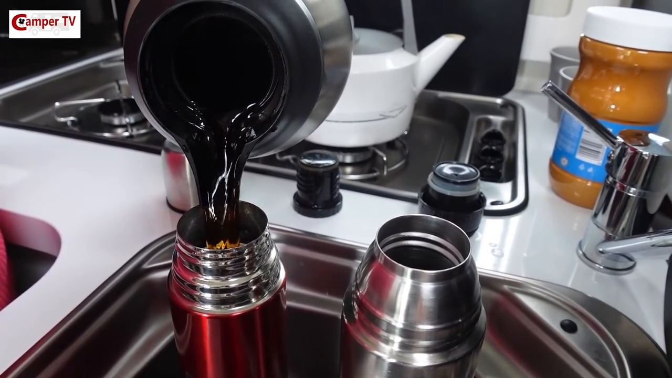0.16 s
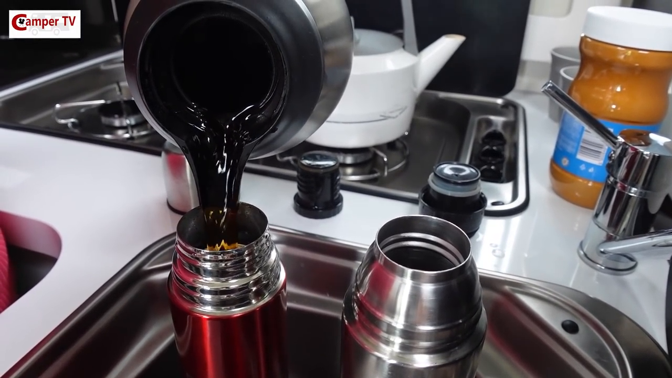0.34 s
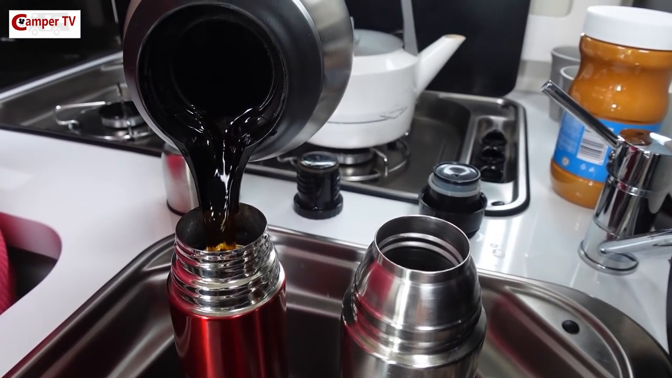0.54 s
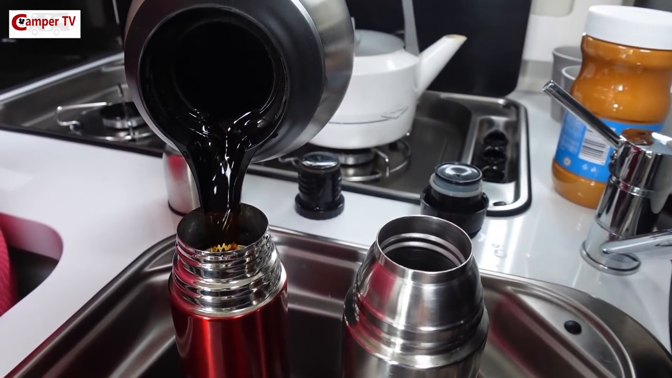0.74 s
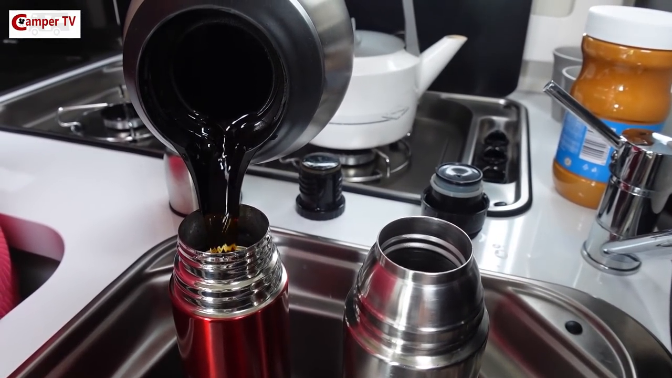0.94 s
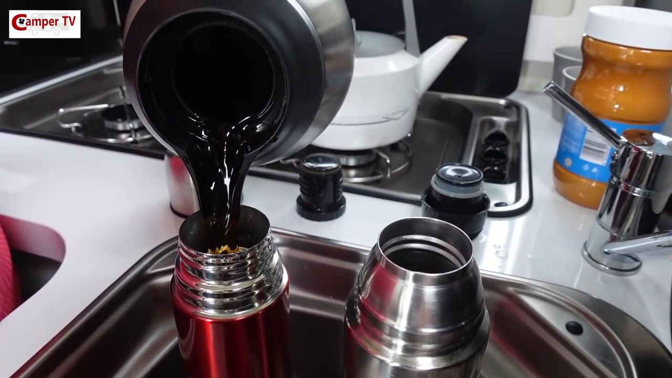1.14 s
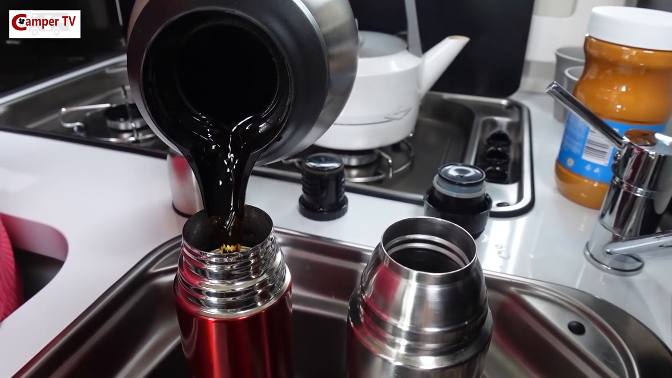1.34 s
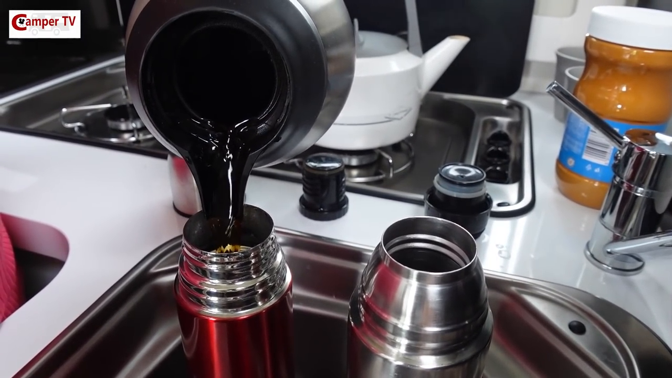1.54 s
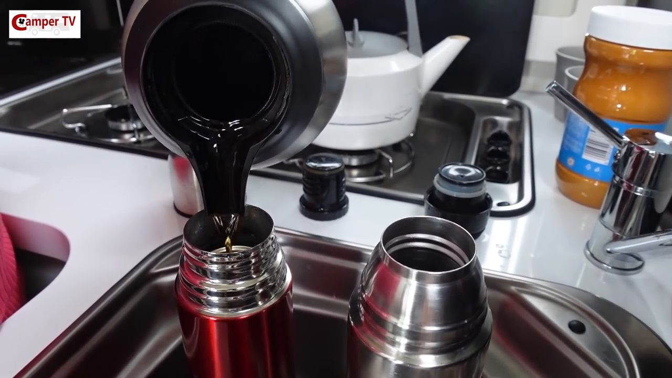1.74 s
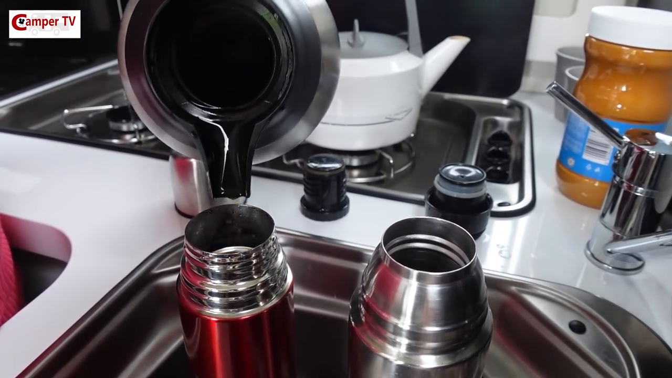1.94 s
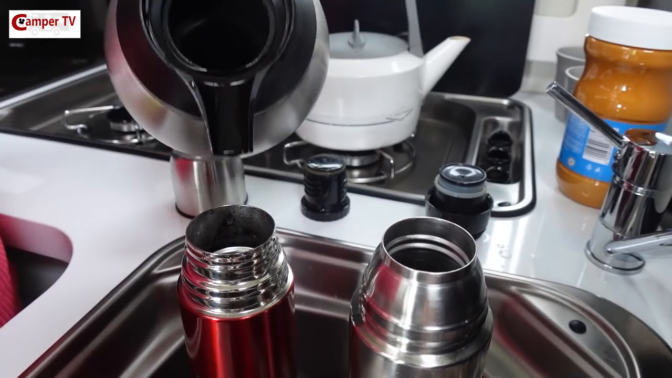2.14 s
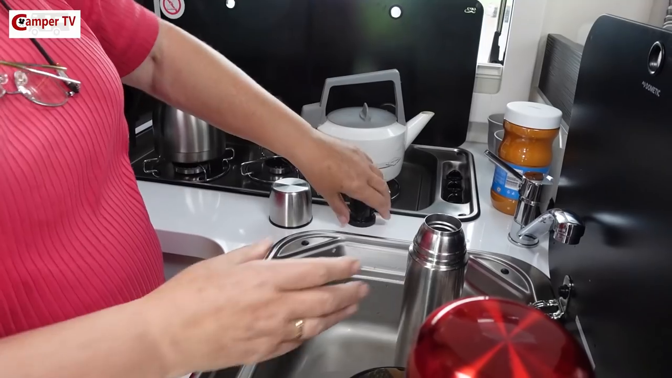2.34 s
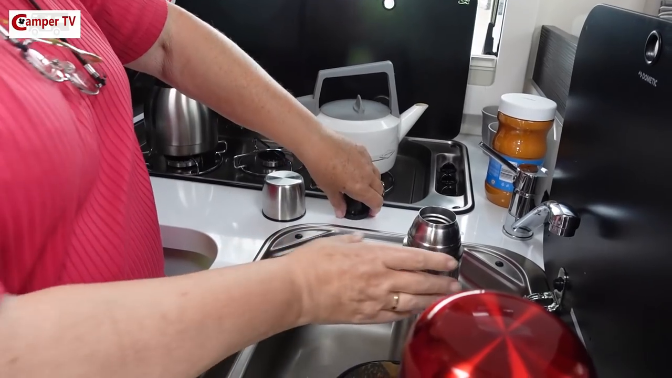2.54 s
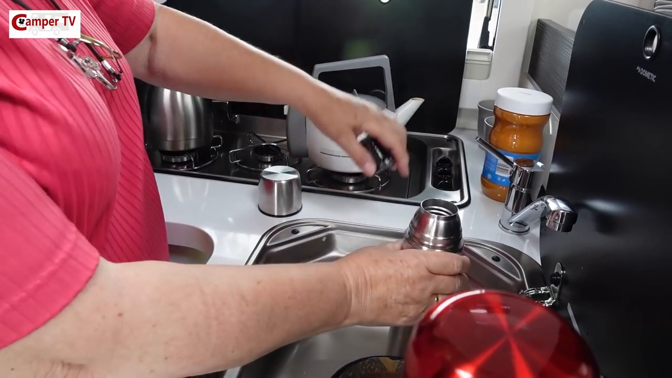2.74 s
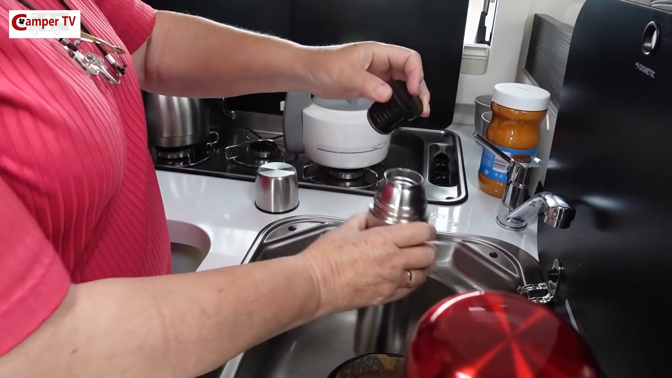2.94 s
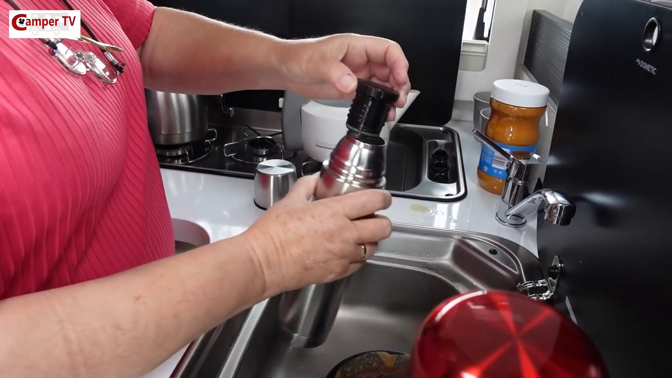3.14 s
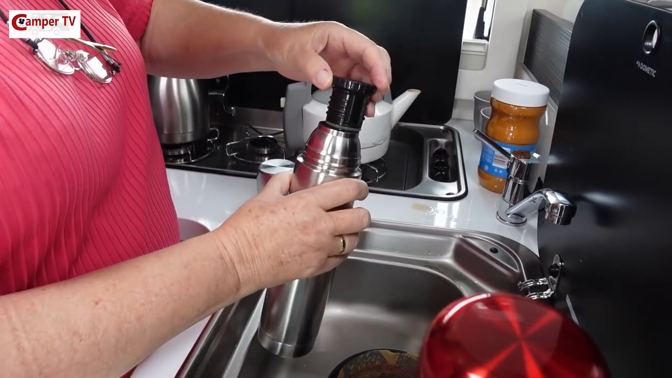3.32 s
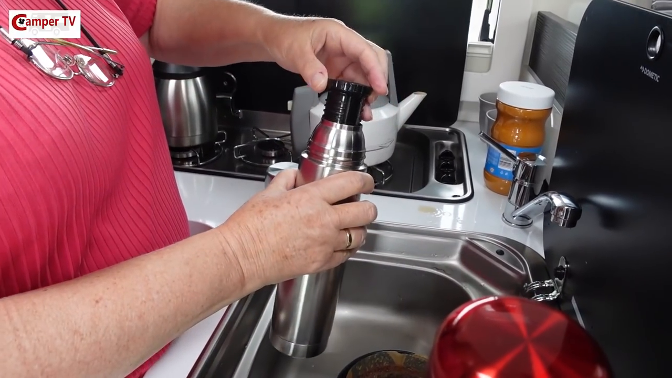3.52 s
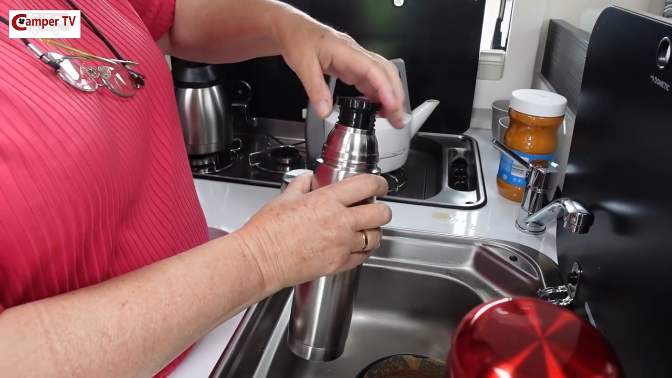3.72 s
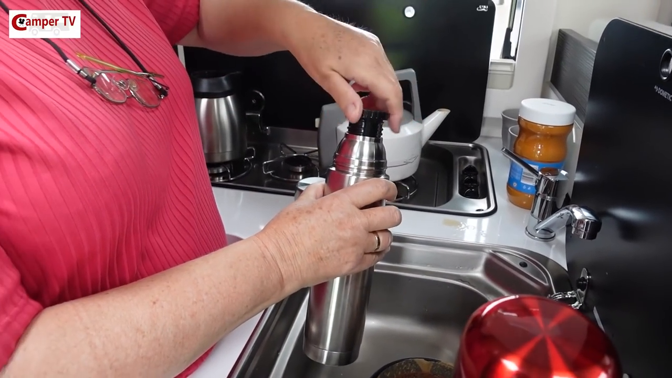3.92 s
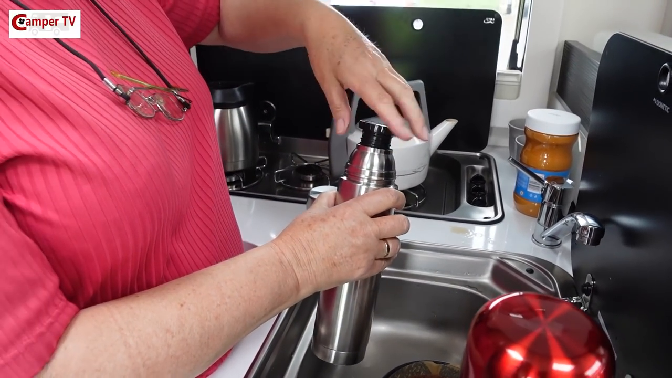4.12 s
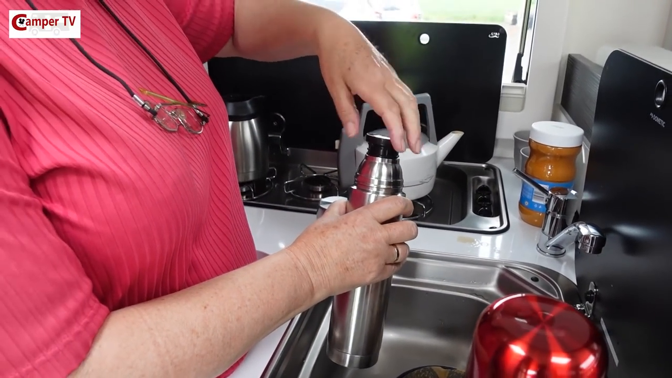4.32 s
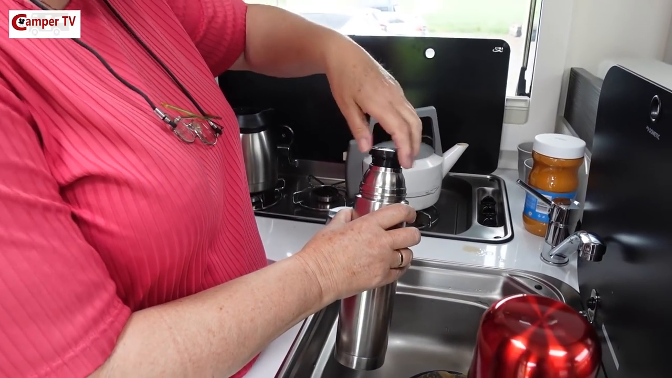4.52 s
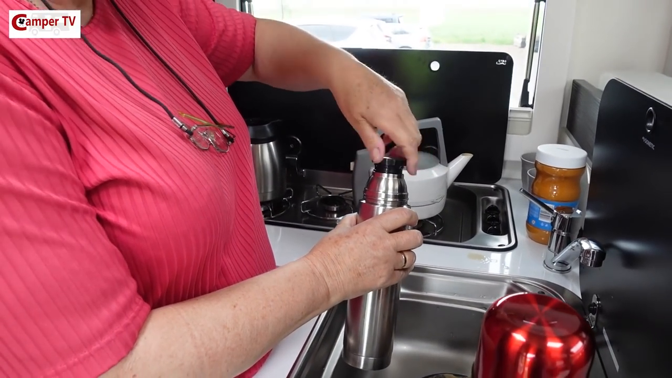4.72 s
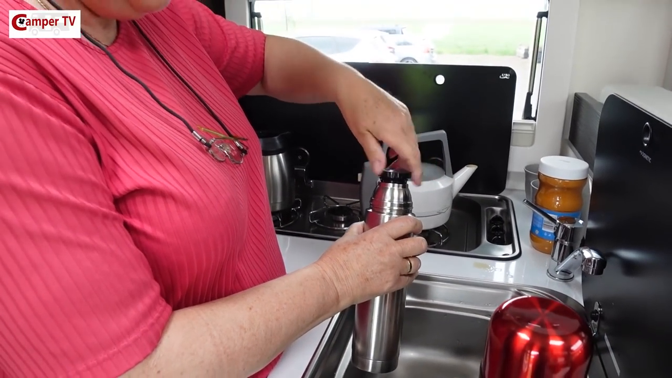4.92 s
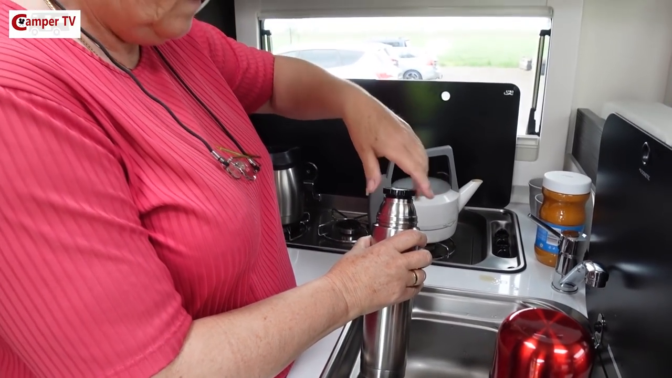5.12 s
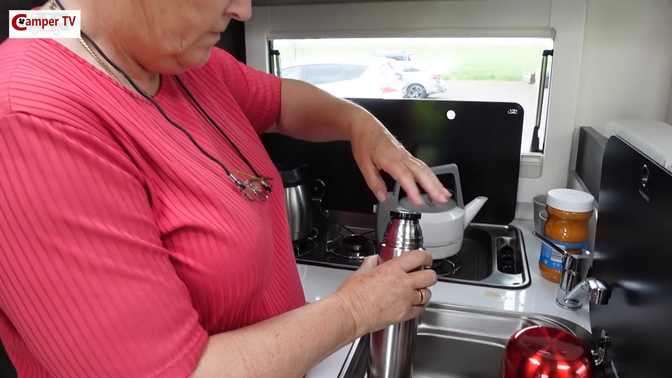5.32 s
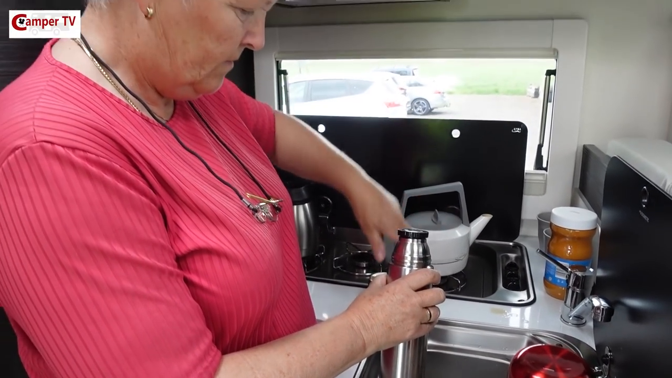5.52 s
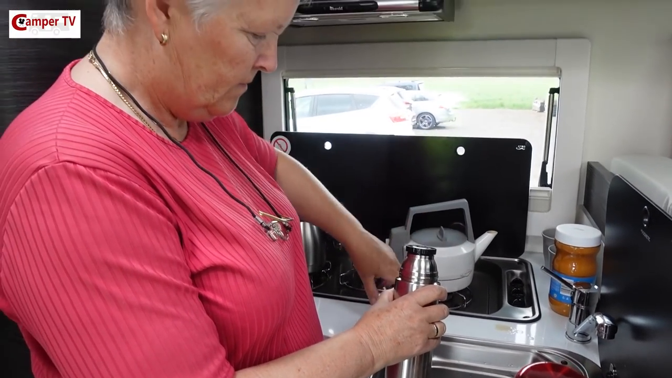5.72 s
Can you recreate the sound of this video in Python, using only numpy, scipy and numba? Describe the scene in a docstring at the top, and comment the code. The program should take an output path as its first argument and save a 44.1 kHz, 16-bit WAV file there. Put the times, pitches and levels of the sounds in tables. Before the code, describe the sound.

Close microphone, dry small room, same sound in both channels. First a lively bubbling stream ringing in a narrow metal neck, with fine splashes; it dwindles to a stop. Next a flask thumps and drags softly, a stopper clicks on steel and falls in with a clatter, then several gritty turns clack and rasp over low, hollow trapped air, ending in quiet room tone.

```python
"""A small, quiet kitchen, heard close up: coffee is poured into a steel vacuum flask standing in the sink.
Bubbles and spatter are noise clicks and short gliding tones that ring the air above the coffee.
The flask is picked up with a bump; a plastic stopper taps its rim, drops into the neck and is screwed down.
Knocks and rasping turns shake stopper, steel and trapped air, which hums lower once the neck is closed."""
import sys
import numpy as np
from scipy import signal
from scipy.fft import rfft, irfft
from scipy.io import wavfile
from scipy.ndimage import uniform_filter1d
from numba import njit

SR = 44100
rng = np.random.default_rng(int(sys.argv[2]) if len(sys.argv) > 2 else 0)


def transcribe(signal):
    """Save signal, clipped to [-1, 1], as a 16-bit WAV file at the path in sys.argv[1]."""
    frames = np.atleast_2d(signal).T
    limited = np.clip(frames, -1, 1)
    pcm = np.round(limited * 32767).astype(np.int16)
    wavfile.write(sys.argv[1], SR, pcm)


N = 254016  # length of the scene in samples
TIME = np.arange(N) / SR  # clock of the whole scene, s
AGE = TIME[:SR // 2]  # clock of one short sound, s

# strength of the stream: [t/s, bubbling level/dB]
STREAM = [(0.0, -24.5), (0.9, -22.5), (1.28, -22.5), (1.34, -29.5), (1.41, -27), (1.45, -21.5),
          (1.8, -24.5), (1.85, -29), (2.03, -28.5), (2.12, -50.5)]
# head of foam, which builds, then collapses as the stream thins: [t/s, foam 0-1]
FOAM_HEAD = [(0.1, 0), (0.55, 0.22), (1.2, 1), (1.8, 0.73), (2.03, 0.22)]
# fixed resonances of neck and basin: [f/Hz, width/Hz, level/dB, change at full foam/dB]
NECK_MODES = [(662, 40, -4, 5), (877, 60, -5, 5), (1150, 22, -4, -1), (2640, 150, -1.5, -5),
              (3620, 110, 0, -3), (4940, 300, -10, -2)]
# big bubbles bursting: [t/s, level/dB]
BIG_BUBBLES = [(0.125, -5.5), (0.151, -11.5), (0.404, -9.5), (0.521, -16.5), (0.585, -6.5), (0.674, -5.5),
               (0.72, -5), (0.809, -6), (0.921, -3.5), (1.169, -7.5), (1.517, -12), (1.747, -4),
               (2.015, -17)]
# drops slapping the wall: [t/s, level/dB]
SLAPS = [(0.1516, -14.5), (0.52, -11), (0.64, -11), (0.69, -7), (0.9998, -8.5), (1.1124, -11),
         (1.156, -7.5), (1.171, -9), (1.2078, -13.5), (1.597, -11), (1.8696, -16.5), (1.892, -11),
         (1.958, -15), (2.075, -25)]
# tone colour of the spatter: [f/Hz, level/dB]
SPATTER_COLOUR = [(2000, -4.5), (3600, -5.5), (4400, -13), (4950, -1), (7200, -6.5), (8770, -2),
                  (11000, -9), (16000, -28)]
# tone colour of the bubbles: [f/Hz, level/dB]
FROTH_COLOUR = [(100, 4), (500, -13), (750, -1.5), (1300, 3.5), (2050, -3.5), (3000, 1), (6000, -10.5),
                (12000, -41)]
# dull bumps on sink and worktop: [t/s, level/dB, f/Hz]
THUDS = [(2.337, -32, 300), (2.472, -12, 339), (2.516, -21.5, 462), (2.540, -26, 436), (2.795, -27, 245),
         (3.278, -30.5, 488), (4, -28.5, 220), (5.582, -25, 149)]
# tone colour of a bump: [f/Hz, level/dB]
THUD_COLOUR = [(70, -0.5), (200, 0.5), (650, -1.5), (1000, -9.5), (2500, -24.5), (6000, -22), (10000, -31),
               (16000, -76)]
# light sliding touches: [start t/s, length/s, level/dB]
SLIDING_TOUCHES = [(2.747, 0.15, -39.5), (3.4, 0.42, -44.5), (5.664, 0.15, -39)]
# tone colour of a sliding touch: [f/Hz, level/dB]
SLIDING_COLOUR = [(120, 15.5), (220, 4), (1600, -3), (3800, -7), (6000, -6.5), (12000, -18)]
# stopper against the neck: [t/s, level/dB, pop of the air relative to it/dB]
STOPPER_KNOCKS = [(3.163, -11.5, -13.5), (3.327, -4, -20.5), (3.426, -22, -24), (3.606, 0.5, -6),
                  (3.689, -2, -10), (3.718, 0, -9), (3.734, 2, -8), (4.079, -16, -19), (4.131, -21, -9),
                  (4.18, -36, 16), (4.33, -6.5, -10), (4.547, -0.5, -22), (4.572, 4, -9),
                  (4.616, -3.5, -10), (4.784, 2.5, -26), (4.803, -2.5, -2.5), (5.004, -9, -17),
                  (5.016, -1, -17.5), (5.084, -3.5, -20), (5.229, 2.5, -13.5), (5.243, 1.5, -50),
                  (5.268, 3.5, -22), (5.316, -1.5, -29)]
# ringing modes of the steel: [f/Hz, level struck on the rim/dB, level through the thread/dB,
# time to fade by 60 dB with the neck open/s]
STEEL_MODES = [(964.3, 5.5, 1.5, 0.2), (2040, -16, -6, 0.089), (2153, 3, 6, 0.11), (2690, -24, -17, 0.8),
               (2880, -16, -32, 0.23), (3287, -14, 0, 0.29), (3690, -5, -3, 0.22), (3727, 0, 4.5, 0.15),
               (5640, -16, 5, 0.11), (5950, 8, 6.5, 0.036), (6090, -4, -5.5, 0.23), (6330, -6, -2, 0.11),
               (9870, -28, 1.5, 0.036)]
# average tone colour of the plastic stopper in the neck: [f/Hz, level/dB]
STOPPER_COLOUR = [(110, -51), (230, -1), (350, -1), (720, 6), (1250, 0), (2150, 0.5), (2550, -9.5),
                  (3900, -3.5), (4900, -11), (6000, -9), (10800, -15), (12500, -35)]
# twists of the hand, a bite of the thread and then a free spin:
# [start t/s, length/s, bite level/dB, spin level/dB]
HAND_TWISTS = [(4.039, 0.17, -32.5, -30), (4.319, .18, -22, -22), (4.551, 0.14, -48, -20.5),
               (4.775, 0.2, -19, -22.5), (5.005, 0.19, -24, -18.5), (5.229, .21, -22, -16.5)]
# tone colour of the quiet room: [f/Hz, level/dB]
ROOM_COLOUR = [(15, -77), (25, -1.5), (117, -8), (170, -15), (439, -14), (714, -18.5), (1020, -23),
               (16000, -30.5)]

# flask dragging in the sink, stopper scraping round the rim: (start s, length s, level dB)
# and what each makes resonate: (Hz, width Hz, dB)
DRAG, DRAG_RING = (2.49, 0.23, -37), [(490, 430, 0)]
RIM_SCRAPE, RIM_RING = (3.42, 0.26, -40), [(3550, 320, -1.5), (4070, 240, -1), (5500, 2200, -10)]
# parts of a twist: (start share, length share, air dB, brightness dB per octave)
BITE, SPIN = (0, 0.4047, -12, 1), (0.3, 0.7, -0.92, 0.68)

# air in the open and in the plugged neck
OPEN_HZ, CLOSED_HZ = 389, 220.2
OPEN_T60_S, CLOSED_T60_S = 0.44, 0.095
# first air resonance: foam lowers and widens it
FOAM_DROP_HZ, CLEAR_WIDTH_HZ, FOAMY_WIDTH_HZ = 52, 11, 210
# it lifts while the thinning stream frees the mouth
THINS_S, STOPS_S, LIFT_HZ = 1.896, 2.04, 57
# second air resonance: climbs as the flask fills
SECOND_HZ, CLIMB_HZ_PER_S, FULL_HZ = 1490, 145, 1724
# layers relative to the bubbling, and what full foam adds to each
GURGLE_DB, GURGLE_FOAM_DB, GURGLE_BUILD_S = 7, -6.5, 0.097
SPATTER_DB, SPATTER_FOAM_DB = -6, 1
CHURN_HZ, CHURN_DB = 203, -13.5  # dull churning of the coffee below the air resonance
BASIN_HZ, BASIN_DB = 93, -12.5  # low drumming of the sink under the flask
HOLLOW_HZ = 499  # gap above the first air resonance
# the stream goes quieter just before a big bubble closes
LULL_S, LULL_DB = 0.02, -1
# spray comes in short spits over an even wash
SPITS_PER_S, SPIT_SPREAD_DB, SPIT_T60_S, WASH_DB, MIST_DB = 85, 3, 0.06, -10, -2
# the glug of foam round a big bubble
GLUG_LEAD_S, GLUG_S, GLUG_WIDTH_HZ, GLUG_DB = 0.012, 0.054, 200, -18
# the stopper slips into the neck and closes it
DROP_S, DROP_EASE_S = 3.59, 0.0348
# ring of the steel under a knock; fingers taking hold for a twist mute it for a moment
RING_DB, GRIP_DB, GRIP_S = -20, -11, 0.035
PRESS_DB_PER_DB = -0.05  # harder blows press the stopper on and ring relatively less
CONTACT_SCATTER_DB = 2.2  # how much the stopper's colour varies between contacts
# the thread catches unevenly: length and typical depth of a catch, range of the contact resonance
CATCH_S, CATCH_DB, CONTACT_HZ = 0.006, 2.4, (1200, 4800)
# the seal meets the neck and stifles the air
SEAL_FROM_S, SEAL_TIGHT_S, SEAL_DB = 5.1, 5.25, -10
# a low rumble while the stopper is tightened and let go
RUMBLE_FROM_S, RUMBLE_TO_S, RUMBLE_HZ, RUMBLE_DB = 4.6, 5.85, 71.4, -40
RELEASE_S, RELEASE_DB = 5.41, -32  # the hand lets go
# room tone, and the recorder's hiss and upper limit
ROOM_DB, HISS_DB, TOP_HZ = -44.5, -63, 16100
# gain control: loud passages pull the gain down, and it creeps back
AGC_THRESHOLD_DB, AGC_SLOPE, AGC_ATTACK_S, AGC_RELEASE_S = -22.5, 0.22, 0.0057, 0.4


def amp(db):
    """Turn decibels into a gain."""
    return 10 ** (np.asarray(db) / 20)


def unit(x):
    """Scale to an rms (average strength) of 1."""
    return x / np.sqrt(np.mean(x ** 2) + 1e-18)


def crest(x):
    """Scale to a peak of 1."""
    return x / np.abs(x).max()


def even(x, size=3000):
    """Hold the running rms near 1 and keep the fine grain."""
    power = uniform_filter1d(x ** 2, size)
    return x / np.sqrt(np.abs(power) + 1e-6 * np.mean(x ** 2))


def curves(table):
    """Join the columns of a table by straight lines in time."""
    s, *columns = np.transpose(table)
    return [np.interp(TIME, s, c) for c in columns]


def add(out, s, x):
    """Mix x into out from time s."""
    i = max(int(s * SR), 0)
    out[i:i + len(x)] += x[:max(len(out) - i, 0)]


def noise():
    """White noise as long as one short sound."""
    return rng.standard_normal(len(AGE))


def fade(t60):
    """Exponential decay that falls by 60 dB in t60 seconds."""
    return np.exp(-np.log(1000) * AGE / t60)


def ring(hz, t60, rise=0.0021):
    """One damped resonance; its pitch may glide."""
    phase = 2 * np.pi * np.cumsum(hz * np.ones(len(AGE))) / SR
    return np.sin(phase) * fade(t60) * (1 - np.exp(-AGE / rise))


def colour(x, points, tilt_db=0, size=2048):
    """Filter with the given (Hz, dB) shape, tilted by dB per octave, without sounding ahead of x."""
    hz, db = np.transpose(points)
    octave = np.log2(np.maximum(np.fft.rfftfreq(size, 1 / SR), 10))
    shape_db = np.interp(octave, np.log2(hz), db) + tilt_db * (octave - np.log2(2000))
    # folding the cepstrum gives the minimum-phase filter
    cepstrum = irfft(np.log(amp(shape_db)))
    cepstrum[1:size // 2] *= 2
    cepstrum[size // 2 + 1:] = 0
    return signal.fftconvolve(x, irfft(np.exp(rfft(cepstrum))))[:len(x)]


@njit
def svf(x, hz, width):
    """State-variable band-pass, gain 1 at the centre."""
    y, b, l = np.empty(len(x)), 0., 0.
    for i in range(len(x)):
        g, k = np.tan(np.pi * hz[i] / SR), width[i] / hz[i]
        v = (b + g * (x[i] + 1e-18 - l)) / (1 + g * (g + k))
        b, l, y[i] = 2 * v - b, l + 2 * g * v, k * v
    return y


def band(x, hz, width_hz):
    """A resonance whose centre and width may move."""
    return svf(x, hz * np.ones(len(x)), width_hz * np.ones(len(x)))


def double_band(x, hz, width_hz, second_width_hz):
    """Two resonances in a row at the same pitch, for steeper sides."""
    return band(band(x, hz, width_hz), hz, second_width_hz)


def clicks(rate, spread_db):
    """Random clicks of very unequal size, rate per second on average."""
    happens = rng.random(N) < rate / SR
    size_db = spread_db * np.minimum(rng.exponential(size=N), 4)
    return happens * rng.choice([-1, 1], N) * amp(size_db)


def reflect(x, t60, wet_db):
    """Direct sound followed by a dense tail from near walls."""
    tail = noise() * fade(t60) * (1 - np.exp(-AGE / 0.0003))
    return x + amp(wet_db) * signal.fftconvolve(x, tail / np.linalg.norm(tail))[:len(x)]


def stroke(length, peak_at):
    """Pressure of one movement: it builds, then lets go."""
    peak_at = np.clip(peak_at, 0.05, 0.95)
    progress = np.interp(AGE / length, [0, peak_at, 1], [0, 0.5, 1])
    return np.sin(np.pi * progress) ** 0.96


def room_tone():
    """The steady murmur of the quiet room: noise with a fixed colour."""
    return amp(ROOM_DB) * unit(colour(rng.standard_normal(N), ROOM_COLOUR, size=8192))


def air_column():
    """Foam, pitch and width of the first air resonance, and pitch of the second, through the pour."""
    foam = np.clip(curves(FOAM_HEAD)[0], 0, 1)
    lift_hz = np.interp(TIME, [THINS_S, STOPS_S], [0, LIFT_HZ])
    first_hz = OPEN_HZ - FOAM_DROP_HZ * foam ** 2 + lift_hz
    width_hz = CLEAR_WIDTH_HZ * (FOAMY_WIDTH_HZ / CLEAR_WIDTH_HZ) ** foam
    second_hz = np.minimum(SECOND_HZ + CLIMB_HZ_PER_S * TIME, FULL_HZ)
    return foam, first_hz, width_hz, second_hz


def bubbles(count, lo_hz, hi_hz, cycles, spread_db):
    """Bubbles born during the pour; each rings for some cycles and glides upward."""
    out = np.zeros(N)
    for when, pitch, life, strength in rng.random((count, 4)):
        hz = lo_hz * (hi_hz / lo_hz) ** pitch
        t60 = cycles * (0.5 + life) / hz
        t = AGE[:int(t60 * SR) + 2]
        tone = np.sin(2 * np.pi * hz * t * (1 + 0.28 * t / t60))
        wave = tone * np.exp(-np.log(1000) * t / t60)
        size = np.sqrt(hz) * amp(-spread_db * np.log(strength + 0.0025))
        add(out, when * STREAM[-1][0], wave * size)
    return out


def spray():
    """Spits of mist and tiny ringing droplets, over a faint even wash of both."""
    spit_power = clicks(SPITS_PER_S, SPIT_SPREAD_DB) ** 2
    spits = np.sqrt(np.abs(signal.fftconvolve(spit_power, fade(SPIT_T60_S) ** 2)[:N]))
    droplets = even(bubbles(count=4500, lo_hz=2400, hi_hz=12000, cycles=45, spread_db=4.5))
    mist = amp(MIST_DB) * rng.standard_normal(N)
    return reflect((droplets + mist) * (unit(spits) + amp(WASH_DB)), t60=0.02, wet_db=-3)


def stream_level():
    """Level of the stream in dB, with a short lull ahead of every big bubble."""
    flow_db, = curves(STREAM)
    for s, _ in BIG_BUBBLES:
        corners = [s - 2 * LULL_S, s - LULL_S / 2, s, s + LULL_S / 10]
        flow_db = flow_db + LULL_DB * np.interp(TIME, corners, [0, 1, 1, 0])
    return flow_db


def pour():
    """The stream beats bubbles into the coffee; they ring the air above it while spray spits."""
    foam, first_hz, foam_hz, second_hz = air_column()
    churn = clicks(rate=830, spread_db=3.5)
    gurgle = even(double_band(churn, first_hz, foam_hz, 210), size=6000)
    gurgle = gurgle * np.minimum(TIME / GURGLE_BUILD_S, 1)
    basin = even(double_band(churn, BASIN_HZ, 70, 90))
    dull_churn = even(double_band(churn, CHURN_HZ, CHURN_HZ, CHURN_HZ))
    # bubbles and the splashing between them
    froth = unit(bubbles(count=4400, lo_hz=262, hi_hz=5160, cycles=20, spread_db=4.8))
    froth = colour(froth + amp(-9.0) * unit(churn), FROTH_COLOUR)
    neck = sum(amp(db + foam_db * foam) * band(froth, hz, width)
               for hz, width, db, foam_db in NECK_MODES)
    second_air = amp(6.0) * double_band(froth, second_hz, 80, 680)
    bubbling = even(second_air + neck + amp(-12) * froth)
    spatter = even(colour(spray(), SPATTER_COLOUR), size=6000)
    air = gurgle * amp(GURGLE_DB + GURGLE_FOAM_DB * foam) + bubbling
    flow = air - band(air, HOLLOW_HZ, 134)
    flow = flow + spatter * amp(SPATTER_DB + SPATTER_FOAM_DB * foam)
    flow = flow + amp(BASIN_DB) * basin + amp(CHURN_DB) * dull_churn
    end_s = STREAM[-1][0]
    return flow * amp(stream_level()) * np.interp(TIME, [end_s, end_s + 0.36], [1, 0])


def gulps():
    """Big bubbles kick the two lowest air resonances and heave the foam; single drops slap the wall."""
    out = np.zeros(N)
    foam, first_hz, foam_hz, second_hz = air_column()
    for s, db in BIG_BUBBLES:
        i = int(s * SR)
        # thick foam takes a harder shove and swallows it sooner
        low_t60 = np.log(1000) / (np.pi * foam_hz[i])
        low = amp(3.5 + 7.2 * foam[i]) * ring(first_hz[i], low_t60, rise=0.0037)
        high = amp(-4.0) * ring(second_hz[i], 0.065, rise=0.00066)
        # a swarm of smaller bubbles swells in the first two neck resonances
        swarm = sum(double_band(noise(), hz, GLUG_WIDTH_HZ, GLUG_WIDTH_HZ) for hz, *_ in NECK_MODES[:2])
        glug = foam[i] * stroke(GLUG_S, peak_at=0.3) * even(swarm, size=900)
        add(out, s - GLUG_LEAD_S, amp(db + GLUG_DB) * glug)
        splash = crest(colour(noise() * fade(0.11), FROTH_COLOUR))
        add(out, s, amp(db) * (low + high + amp(-9.0) * splash))
    for s, db in SLAPS:
        slap = band(noise() * fade(0.03), 9950, 6200)
        add(out, s, amp(db) * crest(colour(slap, SPATTER_COLOUR)))
    return out


def handling():
    """Damped bumps on sink and worktop, and the soft hiss and rumble of sliding touches."""
    out = np.zeros(N)
    for s, db, hz in THUDS:
        contact = noise() * (fade(0.035) + amp(9.5) * fade(0.12))
        # below 340 Hz, a lower bump is also duller
        tilt_db = 4.3 * min(np.log2(hz / 340), 0)
        thud = crest(colour(contact, THUD_COLOUR, tilt_db))
        add(out, s, amp(db) * (thud + amp(-0.5) * ring(hz, 0.082, rise=0.00037)))
    for s, length, db in SLIDING_TOUCHES:
        slide = unit(colour(noise(), SLIDING_COLOUR))
        add(out, s, amp(db) * stroke(length, peak_at=0.055) * slide)
    return out


def scrapes():
    """Light dragging contacts: a grit of clicks excites a few resonances."""
    out = np.zeros(N)
    for (s, length, db), resonances in ((DRAG, DRAG_RING), (RIM_SCRAPE, RIM_RING)):
        grit = clicks(rate=3000, spread_db=3)[:len(AGE)]
        tone = sum(amp(gain_db) * double_band(grit, hz, width, width) for hz, width, gain_db in resonances)
        add(out, s, amp(db) * stroke(length, peak_at=0.3) * even(tone, size=1500))
    return out


def seating(s):
    """Closure of the neck (0-1) at time s and the pitch of the air in it."""
    closure = 1 / (1 + np.exp((DROP_S - s) / DROP_EASE_S))
    return closure, OPEN_HZ + closure * (CLOSED_HZ - OPEN_HZ)


def grip(s):
    """How hard the fingers clamp the flask at time s, 0-1: most at the start of a twist."""
    return max(np.exp(-((s - start) / GRIP_S) ** 2) for start, *_ in HAND_TWISTS)


def stopper_colour():
    """The stopper's colour, different at every point of contact."""
    return [(hz, db + CONTACT_SCATTER_DB * rng.standard_normal()) for hz, db in STOPPER_COLOUR]


def steel(closure):
    """Ring of the flask: each contact weights the modes anew, and the seated stopper damps them."""
    hz, rim_db, thread_db, t60 = np.transpose(STEEL_MODES)
    t60 = 1 / (1 / t60 + 3 * closure)
    # the point of contact moves round as the stopper turns
    scatter_db = (1 + 2.5 * closure) * rng.standard_normal(len(hz))
    mode_db = rim_db + closure * (thread_db - rim_db) + scatter_db
    gain = rng.choice([-1, 1], len(hz)) * amp(mode_db)
    # the changing grip detunes the wall a little
    hz = hz * (1 + 0.006 * closure * rng.standard_normal(len(hz)))
    return sum(g * ring(f, t) for g, f, t in zip(gain, hz, t60))


def knocks():
    """A plastic crack, the ring of the steel and a hollow pop of the air in the neck."""
    out = np.zeros(N)
    for s, db, air_db in STOPPER_KNOCKS:
        closure, air_hz = seating(s + AGE)
        contact = noise() * (fade(0.003) + amp(-5) * fade(0.045) + amp(-22) * fade(0.2))
        # light taps on the rim are duller than jolts in the thread
        crack = crest(colour(contact, stopper_colour(), tilt_db=-1.02 + 2.47 * closure[0]))
        # an open neck rings longer than a plugged one
        air_t60 = OPEN_T60_S * (CLOSED_T60_S / OPEN_T60_S) ** closure[0]
        air = ring(air_hz, air_t60, rise=0.0023)
        ring_db = RING_DB + GRIP_DB * grip(s) + PRESS_DB_PER_DB * db
        add(out, s, amp(db) * (crack + amp(air_db) * air + amp(ring_db) * steel(closure[0])))
    return out


def rub(s, length, air_db, tilt_db):
    """The thread sticks and slips in uneven runs of clicks that shake stopper, steel and trapped air."""
    closure, air_hz = seating(s)
    slips = even(clicks(rate=1200, spread_db=4.5)[:len(AGE)], size=900)
    catches = unit(uniform_filter1d(noise(), int(CATCH_S * SR)))
    force = unit(slips * amp(CATCH_DB * catches)) * stroke(length, peak_at=0.25)
    rasp = colour(reflect(force, t60=0.035, wet_db=1.0), stopper_colour(), tilt_db)
    # the contact has a resonance of its own, which slides as the stopper turns
    contact_hz = np.interp(AGE, [0, length], rng.uniform(*CONTACT_HZ, 2))
    rasp = rasp + band(rasp, contact_hz, contact_hz / 5)
    sing = signal.fftconvolve(force, steel(closure))[:len(AGE)]
    air = double_band(force, air_hz, 56, 93)
    seal_db = np.interp(s, [SEAL_FROM_S, SEAL_TIGHT_S], [0, SEAL_DB])
    mix = unit(rasp) + amp(-3.0) * unit(sing) + amp(air_db + seal_db) * unit(air)
    return np.sqrt(np.mean(force ** 2)) * mix


def turns():
    """Every twist rubs the thread twice: a short bite, then a longer and hollower spin."""
    out = np.zeros(N)
    for start, length, bite_db, spin_db in HAND_TWISTS:
        for db, (begins, lasts, air_db, tilt_db) in ((bite_db, BITE), (spin_db, SPIN)):
            s = start + begins * length
            add(out, s, amp(db) * rub(s, lasts * length, air_db, tilt_db))
    return out


def rumble():
    """A soft, deep swell of noise under the last twists and the letting go."""
    progress = np.clip((TIME - RUMBLE_FROM_S) / (RUMBLE_TO_S - RUMBLE_FROM_S), 0, 1)
    deep = even(double_band(rng.standard_normal(N), RUMBLE_HZ, 50, 53))
    return amp(RUMBLE_DB) * np.sin(np.pi * progress) * deep


def release():
    """The fingers let go after the last twist and the longest mode of the steel sings on."""
    out = np.zeros(N)
    hz, *_, t60 = max(STEEL_MODES, key=lambda mode: mode[-1])
    add(out, RELEASE_S, amp(RELEASE_DB) * ring(hz, t60 / 2))
    return out


def scene():
    """All sounds in a small kitchen with near walls, the same in both channels."""
    near = pour() + gulps() + handling() + scrapes() + knocks() + turns() + release()
    mono = reflect(near, t60=0.17, wet_db=-12.5) + rumble() + room_tone()
    return np.array([mono, mono])


@njit
def follow(x, attack, release):
    """Level follower that rises fast and falls slowly."""
    y, e = np.empty(len(x)), 0.
    for i in range(len(x)):
        e += (abs(x[i]) - e) * (attack if abs(x[i]) > e else release)
        y[i] = e
    return y


def record(dry):
    """The recorder drops the deepest bass, adds faint hiss, rides the gain, rounds peaks and cuts the top."""
    sound = signal.sosfilt(signal.butter(2, 22, "high", fs=SR, output="sos"), dry)
    hiss = np.array([unit(double_band(rng.standard_normal(N), 11700, 16000, 16000)) for _ in dry])
    level = follow(sound[0], 1 / (AGC_ATTACK_S * SR), 1 / (AGC_RELEASE_S * SR))
    gain = np.maximum(level / amp(AGC_THRESHOLD_DB), 1) ** -AGC_SLOPE
    sound = np.tanh(0.91 * gain * (sound + amp(HISS_DB) * hiss)) / 0.88
    return signal.sosfilt(signal.ellip(8, 0.2, 70, TOP_HZ, fs=SR, output="sos"), sound)


dry = scene()
out = record(dry)
transcribe(out)
```